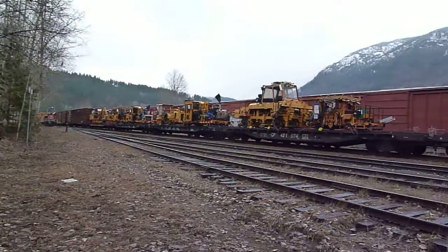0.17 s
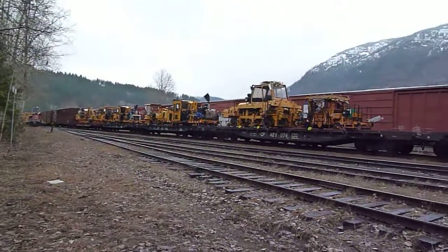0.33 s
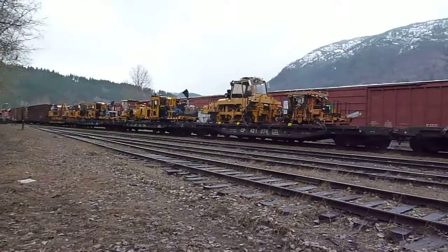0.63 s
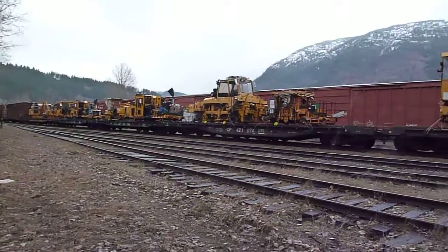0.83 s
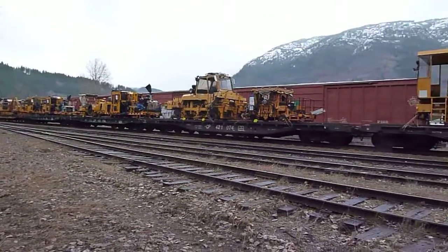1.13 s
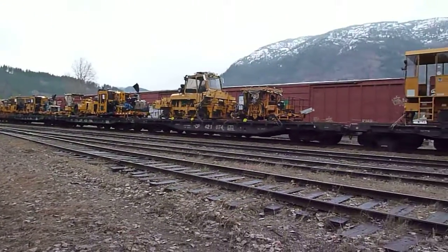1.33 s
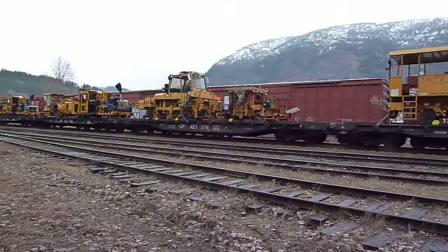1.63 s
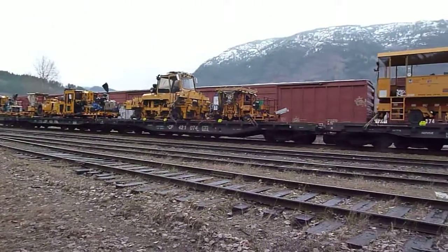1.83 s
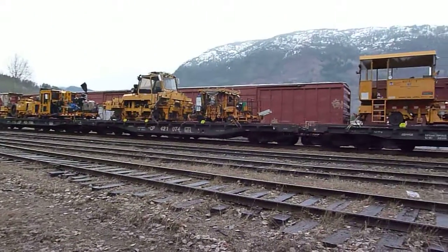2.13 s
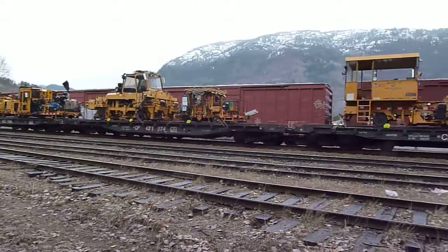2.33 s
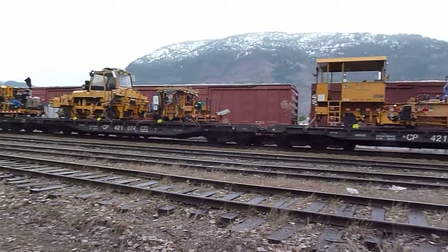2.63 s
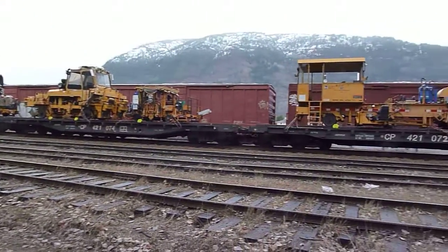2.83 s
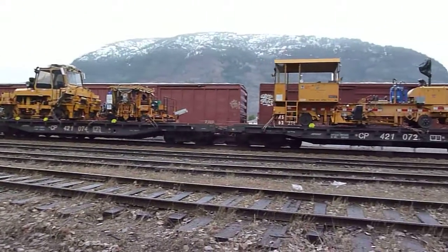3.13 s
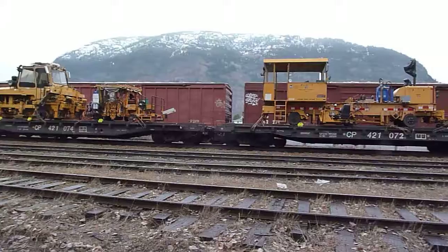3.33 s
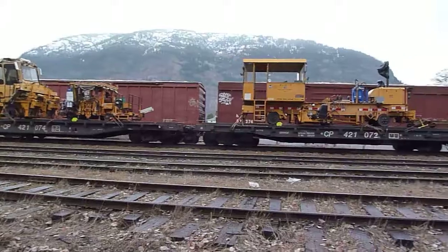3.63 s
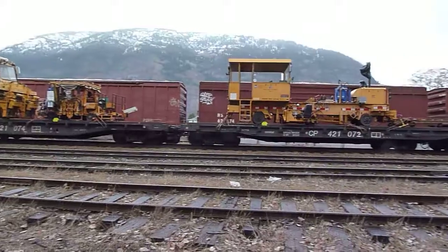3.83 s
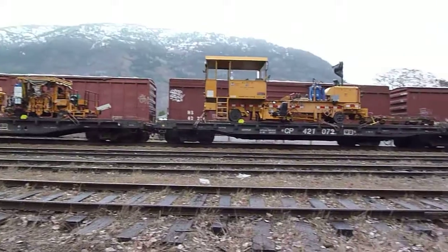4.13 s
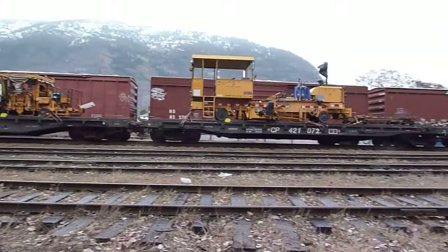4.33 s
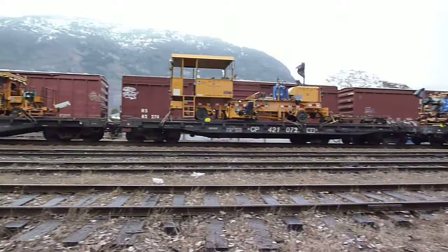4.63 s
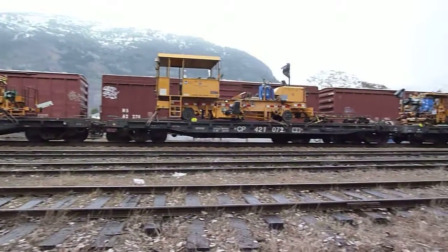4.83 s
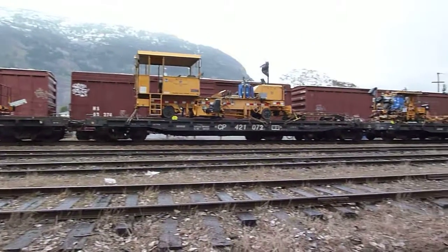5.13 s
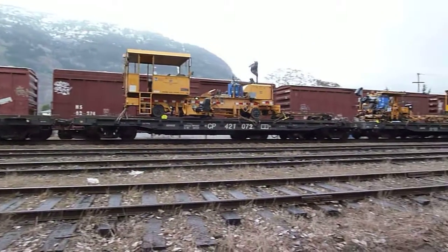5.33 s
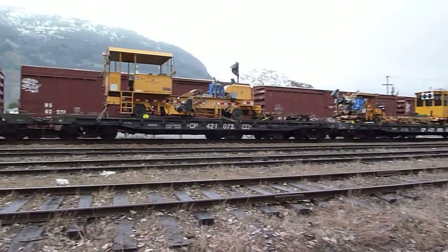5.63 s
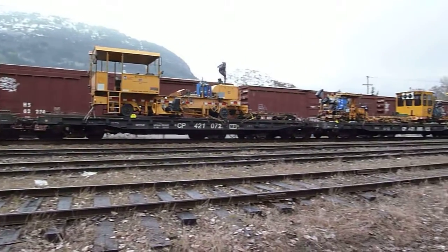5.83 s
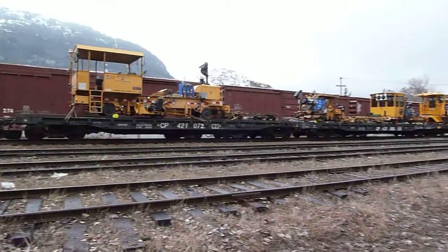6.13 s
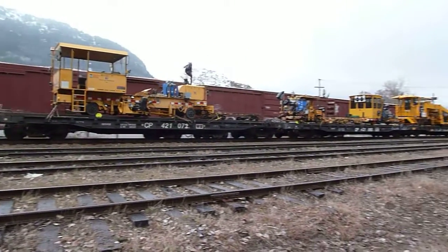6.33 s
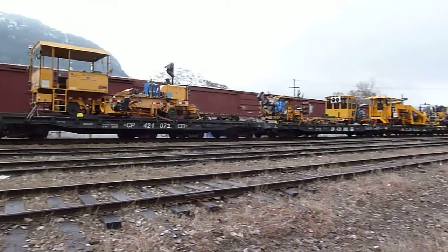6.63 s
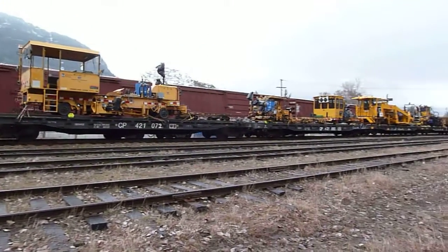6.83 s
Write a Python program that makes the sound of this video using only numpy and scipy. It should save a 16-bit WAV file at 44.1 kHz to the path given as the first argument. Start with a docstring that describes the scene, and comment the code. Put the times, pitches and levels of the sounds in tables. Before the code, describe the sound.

Loaded flat cars rumble slowly through a rail yard with steel clanks, joint clacks and wavering squeal, birds chirping, wind thumping at the end.

```python
"""A rail yard, heard from a few tracks away, as loaded flat cars roll slowly through.
Filtered noise makes the wheels' rumble, roar, hiss and ringing; moving narrow bands of noise make boom and squeal.
Bursts ringing in steel make rail-joint clacks and coupling clanks, and beating tones make a diesel throb.
Small birds on the left are gliding tones and bursts of noise; a rising breeze buffets the two microphone ports."""
import sys
import numpy as np
from scipy import signal
from scipy.fft import rfft, irfft, next_fast_len
from scipy.io import wavfile
from scipy.ndimage import uniform_filter1d, minimum_filter1d, map_coordinates

SR = 44100
rng = np.random.default_rng(int(sys.argv[2]) if len(sys.argv) > 2 else 0)


def put_to_file(sound):
    """Save the sound as 16-bit audio at rate SR, in the file named by the first command-line argument."""
    columns = np.atleast_2d(sound).T  # one column per channel
    safe = np.clip(columns, -1, 1)
    whole_steps = np.round(safe * 32767)
    wavfile.write(sys.argv[1], SR, whole_steps.astype(np.int16))


N = 307377

# steady rolling, louder as each group of wheels comes near; each layer adds its own gain:
# time_s, roar_db (rails), hiss_db (wheel contact)
ROLLING_LEVELS = [(0.0, -37.5, -47), (0.78, -38.5, -46.5), (0.99, -40, -49.5), (1.48, -38.5, -45.5),
                  (1.96, -39, -51), (3.02, -42.5, -48.5), (4.35, -39, -49.5), (4.6, -38, -46),
                  (5.61, -39, -45.5), (6.35, -42, -49.5)]
# ringing of loose steel parts, before any shift in pitch: pitch_hz, width_hz, relative_level_db
STEEL_MODES = [(460, 230, 2), (800, 480, 1.5), (1180, 730, -3.5), (1790, 490, -1.5), (2530, 510, -5),
               (3900, 2000, -23.5)]


def amp(db):
    """Turn decibels into a gain."""
    return 10 ** (np.asarray(db) / 20)


def unit(x):
    """Scale a signal to an average (rms) level of 1."""
    return x / np.sqrt(np.mean(x ** 2) + 1e-20)


def along(points, hz):
    """Read a curve of (frequency, value) points on a logarithmic frequency axis."""
    f, v = np.transpose(points)
    return np.interp(np.log(hz + 1), np.log(f + 1), v)


def curves(rows):
    """Join table points by straight lines: one value per sample for each column after the time."""
    s, *columns = np.transpose(rows)
    return [np.interp(np.arange(N) / SR, s, column) for column in columns]


def wobble(rate):
    """Make a smooth random curve with this many random points a second."""
    points = rng.standard_normal(int(N * rate / SR) + 4)
    return map_coordinates(points, [np.arange(N) * rate / SR])


def swells(rows):
    """Gain of bell-shaped swells (time, half length, dB); overlapping ones add as power."""
    t = np.arange(N) / SR
    return np.sqrt(sum(amp(db) ** 2 * np.exp(-((t - s) / length) ** 2) for s, length, db in rows))


def filtered(x, response):
    """Shape a sound by a gain that depends on frequency."""
    m = next_fast_len(N + SR // 2)
    return irfft(rfft(x, m) * response(np.fft.rfftfreq(m, 1 / SR)), m)[..., :N]


def resonances(modes, f):
    """Response of a body that rings at several (Hz, width Hz, dB) modes after it is driven."""
    total = 0
    for k, (center, width, db) in enumerate(modes):
        sign = (-1) ** k
        total = total + sign * amp(db) * 1j * f * width / (center * center - f * f + 1j * f * width)
    return total


def add(track, s, sound):
    """Mix a sound into a track, starting at s seconds."""
    part = track[..., max(0, round(s * SR)):][..., :sound.shape[-1]]
    part += sound[..., :part.shape[-1]]


def spread(pair):
    """Blend two unrelated signals into left and right: alike in the bass, wider in the treble."""
    # how alike the two sides are: pitch_hz, likeness (1 = the same)
    likeness = [(60, 1), (500, 1), (1100, 0.89), (2000, 0.58), (3200, 0.26), (5000, 0.27), (7000, 0.59)]

    def mid_side_gains(hz):
        turn = np.arccos(np.clip(along(likeness, hz), -1, 1)) / 2
        return np.array([np.cos(turn), np.sin(turn)])

    mid, side = filtered(pair, mid_side_gains)
    return unit(np.array([mid + side, mid - side]))


def rush(spectrum, patchy_db):
    """Stereo noise of rms 1, with random louder and softer patches in time and pitch."""
    z = signal.stft(rng.standard_normal((2, N)), nperseg=512)[2]
    field = uniform_filter1d(rng.standard_normal(z.shape[1:]), size=5, axis=0)  # smooth over pitch
    field = uniform_filter1d(field, size=14, axis=1)  # smooth over time
    pair = signal.istft(z * amp(patchy_db * unit(field)), nperseg=512)[1][:, :N]
    return spread(filtered(pair, lambda hz: amp(along(spectrum, hz))))


def drone(hz, width_hz):
    """A resonance of rms 1 kept going by random pushes; its pitch may move."""
    phase = 2 * np.pi * np.cumsum(hz * np.ones(N)) / SR
    return unit(wobble(width_hz) * np.cos(phase) + wobble(width_hz) * np.sin(phase))


def yard(x):
    """Diffuse echo from standing cars and trees: a fading tail of noise, different for each ear."""
    # time the echo takes to fade by 60 dB: pitch_hz, fade_s
    echo_fade = [(150, 0.31), (1500, 0.43), (7000, 0.64)]
    hz, t, z = signal.stft(rng.standard_normal((2, SR // 2)), SR, nperseg=256)
    fading = z * amp(-60 * t / along(echo_fade, hz)[:, None])
    tail = signal.istft(fading, SR, nperseg=256)[1]
    return signal.fftconvolve(x[None], tail / np.linalg.norm(tail[0]), axes=1)[:, :N]


def diesel(drone_hz=59, level_db=-31, beat_hz=5.2, beat_db=-13):
    """An exhaust drone with two weak upper tones; a tone just below it beats with it and makes it throb."""
    # loudness of the engine: time_s, relative_level_db
    fade = [(0, -7.5), (1.2, 0), (6.1, 0), (6.7, -13)]
    fade_db, = curves(fade)
    phase = 2 * np.pi * np.cumsum(drone_hz + 0.18 * wobble(4.4)) / SR
    throb = amp(beat_db) * np.sin(phase - 2 * np.pi * beat_hz * np.arange(N) / SR)
    crank = phase / 3  # the main drone is three times the crank's pitch
    upper = amp(-9.5) * np.sin(5 * crank) + amp(-14.5) * np.sin(7 * crank)
    return amp(level_db + fade_db) * np.sqrt(2) * (np.sin(phase) + throb + upper)


def whistles(arch_hz=39, quaver_hz=75, wet_db=-3):
    """Thin gliding bird notes that bow upward in the middle, quaver and echo among the trees."""
    # bird notes, pitch before bow and quaver: start_s, length_s, starting_pitch_hz, fall_hz, level_db
    notes = [(0.025, 0.03, 7090, 382, -39), (0.054, 0.042, 6740, 63, -43.5),
             (0.268, 0.057, 7230, -4.5, -49), (0.278, 0.038, 6800, -63, -43),
             (0.333, 0.044, 7360, 76, -38.5), (0.404, 0.051, 7380, 64, -37), (0.46, 0.026, 7200, 201, -39),
             (0.766, 0.14, 7370, 37, -46.5), (0.895, 0.096, 7500, 738, -46),
             (1.65, .012, 6600, -200, -50.5), (1.672, 0.012, 6550, -350, -44), (1.7, .012, 6900, 307, -49),
             (1.753, 0.014, 6540, -300, -46), (1.779, 0.047, 6740, 102, -44), (1.861, 0.19, 7140, -27, -53),
             (1.893, .025, 6550, 51, -51), (2.073, 0.082, 7020, 94, -48), (2.125, 0.02, 6500, 127, -38.5),
             (2.552, 0.085, 7100, 379, -49), (2.679, 0.039, 6730, -280, -41.5),
             (3.494, 0.072, 6900, 45, -48.5), (3.568, 0.06, 6930, 126, -50)]
    song = np.zeros(N)
    for s, length, start_hz, fall_hz, db in notes:
        u = np.linspace(0, 1, max(8, int(length * SR)))
        bow = np.abs(np.sin(np.pi * u))
        hz = start_hz - fall_hz * u + arch_hz * bow + quaver_hz * wobble(200)[:len(u)]
        add(song, s, amp(db) * np.sqrt(bow) * np.sin(2 * np.pi * np.cumsum(hz) / SR))
    return song + amp(wet_db) * yard(song)


def chips(rise_s=0.0022, gain_db=11.5, wet_db=-11):
    """Short, toneless scolding notes: bursts of noise in three broad bands, with a faint echo."""
    # bird chips, before the shared gain: start_s, level_db, decay_s
    calls = [(2.153, -37.5, 0.03), (2.288, -37, 0.016), (2.333, -39.5, 0.022), (2.393, -36, .013),
             (2.492, -35.5, 0.02), (2.538, -38, 0.021), (2.646, -37, 0.019), (2.813, -36.5, 0.017),
             (2.873, -38, 0.025), (2.931, -39, 0.022), (2.97, -38, 0.028), (3.995, -40, .025),
             (6.578, -39, 0.065), (6.661, -39, 0.044)]
    # bands of their noise: pitch_hz, width_hz, relative_level_db
    bands = [(4350, 370, -6.5), (6180, 910, -3.5), (6860, 1500, -7)]
    t = np.arange(SR // 4) / SR
    bursts = np.zeros(N)
    for s, db, decay_s in calls:
        shape = (1 - np.exp(-t / rise_s)) * np.exp(-t / decay_s)
        add(bursts, s, amp(db + gain_db) * shape * rng.standard_normal(len(t)))
    notes = filtered(bursts, lambda f: resonances(bands, f))
    return notes + amp(wet_db) * yard(notes)


def birds():
    """The small flock sits a little to the left: slightly louder there than on the right."""
    return (whistles() + chips()) * amp([[.7], [-.7]])


def breeze(calm_db=-43, freshen_db_per_s=0.8, lumpy_db=1.5, tearing_db=14, t60_s=0.04, attack_s=0.0025):
    """Air pushes each port on its own, brighter when strong; the biggest eddies land as dull thuds."""
    # gusts on the ports: time_s, half_length_s, level_db
    gusts = [(1.0, 0.018, -30), (4.05, 0.092, -31), (5.635, .018, -28), (5.77, 0.03, -31),
             (5.91, 0.044, -25.5), (6.1, 0.023, -27.5), (6.58, 0.11, -19.5), (6.83, 0.046, -21)]
    # slow, inaudible shoves of air that add to the peaks the limiter meets: time_s, half_length_s, level_db
    shoves = [(6.53, 0.065, -16), (6.88, 0.028, -15)]
    # eddies that slap a port: start_s, peak_db, pitch_hz, left_over_right_db
    eddies = [(6.514, -8, 210, -2.5), (6.524, -20, 410, 7), (6.537, -15, 129, -2),
              (6.586, -12.5, 154, -9.5), (6.646, -13.5, 270, 8.5), (6.676, -11.5, 199, 2),
              (6.831, -10.5, 278, 2), (6.845, -14.5, 240, -13.5)]
    # tone of the ordinary buffeting: pitch_hz, relative_level_db (per Hz)
    buffet = [(20, -13), (55, 0.5), (95, 5.5), (180, -1.5), (300, -11), (550, -21), (1000, -30.5),
              (2500, -53), (7000, -78)]
    # tone of what strong gusts add: pitch_hz, relative_level_db (per Hz)
    tearing = [(100, -16.5), (220, 2.5), (400, 2), (700, -11), (1200, -29.5), (2500, -40), (7000, -67)]
    calm = amp(calm_db + freshen_db_per_s * np.arange(N) / SR + 2.7 * wobble(4.4))
    flow = np.hypot(calm, swells(gusts))
    lumps = amp(lumpy_db * np.array([wobble(60), wobble(60)]))

    def churn(spectrum):
        noise = lumps * rng.standard_normal((2, N))
        return unit(filtered(noise, lambda hz: amp(along(spectrum, hz))))

    wind = flow * churn(buffet)
    wind += amp(tearing_db) * flow ** 2 * churn(tearing)  # grows with the square of the flow
    wind += swells(shoves)
    t = np.arange(SR // 5) / SR
    for s, db, hz, pan_db in eddies:
        thud = np.sin(2 * np.pi * hz * t) * amp(-60 * t / t60_s) * (1 - np.exp(-t / attack_s))
        sides = amp([[pan_db / 2], [-pan_db / 2]])
        add(wind, s, thud / np.abs(thud).max() * amp(db) * sides)
    return wind


def tick(s=6.9495, db=-20):
    """One small dry click: a very short burst of noise in one broad band."""
    t = np.arange(SR // 100) / SR
    click = np.zeros(N)
    add(click, s, amp(db - 60 * t / 0.0054) * rng.standard_normal(len(t)))
    return filtered(click, lambda f: resonances([(3500, 3000, 2.3)], f))


def rattle(level_db=-51, t60_s=0.061, count=150):
    """Chains and loose fittings on the load clink faintly at random, ringing like steel."""
    t = np.arange(SR // 10) / SR
    shake = np.zeros(N)
    for when, size in rng.random((count, 2)):
        add(shake, when * N / SR, amp(-10 * size - 60 * t / t60_s))
    clinks = filtered(shake * rng.standard_normal((2, N)), lambda f: resonances(STEEL_MODES, f))
    return amp(level_db) * spread(clinks)


def clanks(rise_s=0.0014, clash_t60_s=0.034, strike_db=11, tail_db=-17, tail_t60_s=0.68,
           knock_t60_s=0.078, knock_gain_db=3, side_db=-9, wet_db=-12):
    """Slack steel parts strike and clash, each at its own pitch, chatter on and knock the frame."""
    # slack couplings and chains: start_s, level_db, low_knock_db (before its gain), pitch_ratio
    hits = [(.561, -22.5, -1, 1.4), (.835, -21.5, 0, 0.83), (1.228, -25, -9, 1.43), (1.28, -23, 6.5, 0.91),
            (1.447, -18, -12, 0.83), (3.113, -22.5, 0, 1.2), (3.726, -18.5, -3, 0.69),
            (4.131, -19.5, -4.5, 1), (4.155, -21, -11, 1.1), (5.081, -20.5, -8.5, 1.4),
            (5.197, -13.5, -18, 1.02), (5.215, -16.5, -6, .9), (6.046, -25, -4, 1.9),
            (6.382, -17, -12, 1.3)]
    t = np.arange(SR // 3) / SR
    f = np.fft.rfftfreq(SR, 1 / SR)
    track = np.zeros((2, N))
    middle_only = np.array([[1], [0]])
    chatter = amp(-60 * t / clash_t60_s) + amp(tail_db - 60 * t / tail_t60_s)
    fade = (1 - np.exp(-t / rise_s)) * chatter
    for s, db, knock_db, pitch in hits:
        a, b = rng.standard_normal((2, 2, len(t)))
        # the strike is a single sharp push, the clash a burst of noise
        clash = (rfft(a * fade, SR) + amp(strike_db) * middle_only) * resonances(STEEL_MODES, f / pitch)
        thump = b * amp(knock_db + knock_gain_db - 60 * t / knock_t60_s)
        knock = rfft(thump, SR) * resonances([(376, 380, 0.011)], f / pitch)
        add(track, s, amp(db) * irfft(clash + knock * middle_only, SR)[:, :len(t)])
    mid, side = track[0], amp(side_db) * track[1]
    return np.array([mid + side, mid - side]) + amp(wet_db) * yard(mid)


def clacks(rise_s=0.00062, t60_s=0.04, thump_hz=410, thump_width_hz=300, thump_t60_s=0.035,
           dull_hz=4300, wet_db=-7):
    """A wheel drops over a rail joint: a crack in the rail ends, a thump in the bogie, dulled by distance."""
    # wheels at the joint: start_s, crack_db, thump_over_crack_db
    drops = [(1.436, -27, 1), (3.039, -39, 9.5), (3.102, -33.5, 6), (3.74, -37.5, -2), (5.068, -40.5, 13),
             (5.191, -29.5, -9)]
    # ringing of the rail ends: pitch_hz, width_hz, relative_level_db
    rail_ends = [(880, 220, 6.5), (1730, 310, 5.5), (2150, 600, -1), (2500, 170, 4), (3150, 640, -14.5),
                 (4400, 470, -19)]
    t = np.arange(SR // 8) / SR
    f = np.fft.rfftfreq(SR, 1 / SR)

    def burst(modes, decay_s):
        contact = rng.standard_normal(len(t)) * (1 - np.exp(-t / rise_s)) * amp(-60 * t / decay_s)
        ring = irfft(rfft(contact, SR) * resonances(modes, f), SR)[:len(t)]
        return ring / np.std(ring[:SR // 100])  # level set over the first hundredth of a second

    hits = np.zeros(N)
    for s, db, thump_db in drops:
        crack = burst(rail_ends, t60_s)
        thump = burst([(thump_hz, thump_width_hz, 0)], thump_t60_s)
        add(hits, s, amp(db) * (crack + amp(thump_db) * thump))
    hits = signal.lfilter(*signal.butter(2, dull_hz, fs=SR), hits)
    return hits + amp(wet_db) * yard(hits)


def flanges(waver=.013, waver_rate=40, width_hz=115, chatter_db=1.0):
    """Flanges grind along the rail in one rough, wavering squeal; where they bind, other modes join in."""
    # the long squeal, before wavering: time_s, pitch_hz, level_db
    squeal_path = [(3.7, 1360, -66), (3.92, 1365, -52.5), (4.22, 1360, -51), (4.36, 1370, -44.5),
                   (4.64, 1425, -44.5), (5.24, 1400, -59), (5.33, 1385, -38.5), (5.53, 1410, -43.5),
                   (5.9, 1425, -45.5), (6.4, 1370, -64)]
    # flanges binding on the rail, before wavering: time_s, half_length_s, pitch_hz, width_hz, level_db
    bind_list = [(4.123, 0.068, 1900, 92.4, -56), (5.1, .13, 2930, 350, -49.5),
                 (5.347, 0.065, 2290, 130, -45), (5.44, 0.075, 3190, 750, -46),
                 (6.865, 0.055, 940, 91.4, -40.5)]
    t = np.arange(N) / SR
    bend = 1 + waver * wobble(waver_rate)
    pitch_hz, level_db = curves(squeal_path)
    squeal = amp(level_db) * drone(pitch_hz * bend, width_hz)
    binds = np.zeros(N)
    for s, length, hz, width, db in bind_list:
        swell = np.exp(-.5 * ((t - s) / length) ** 2)
        binds += amp(db) * swell * drone(hz * bend, width)
    return (squeal + binds) * unit(amp(chatter_db * wobble(70)))


def wheels(gain_db=-9):
    """Rubbing on the rail keeps the wheel discs ringing, most of all as they come abreast."""
    # ringing of the wheel discs: pitch_hz, width_hz, relative_level_db
    discs = [(1337, 46, 0.5), (1385, 31, 6.5), (1465, 35, -2.5), (2665, 33, -3.5), (3010, 25, -3.5)]
    _, hiss_db = curves(ROLLING_LEVELS)
    ring = spread(filtered(rng.standard_normal((2, N)), lambda f: resonances(discs, f)))
    return amp(hiss_db + gain_db + 1.0 * wobble(11)) * ring


def boom(width_hz=24):
    """The main resonance of the decks wanders in pitch and surges under heavy wheels."""
    # hollow boom, drifting as the cars go by: time_s, pitch_hz, level_db
    path = [(0, 190, -41), (1.0, 205, -38), (1.9, 178, -34), (2.3, 205, -30.5), (2.7, 215, -31),
            (3.3, 222, -33.5), (3.7, 215, -33), (4.0, 195, -37), (4.4, 210, -30.5), (4.9, 197, -25),
            (5.3, 208, -32), (5.58, 190, -38.5), (5.82, 190, -22.5), (6.05, 200, -42), (6.3, 215, -27.5),
            (6.97, 205, -35.5)]
    hz, db = curves(path)
    return amp(db) * drone(hz, width_hz)


def bogies(thud):
    """Each thud sets the bogie frames droning hollowly: noise through their modes, swelling with it."""
    # frame modes, before squaring sharpens them: pitch_hz, width_hz, relative_level_db
    frame = [(276, 42.5, 2.5), (365.4, 28, 4.5), (471.4, 34, 1.5), (585, 27, 0.5)]
    hollow = filtered(rng.standard_normal((2, N)), lambda f: resonances(frame, f) ** 2)
    return thud * amp(wobble(6.3)) * spread(hollow)


def rolling(roar_gain_db=3, hiss_gain_db=5.5, scuff_hiss_db=-10.5, scuff_deck_db=-0.5):
    """Rough treads shake decks and rails and swell at each scuff; the same bumps roughen roar and hiss."""
    # deck rumble, easing once the loaded car is past: time_s, level_db
    rumble_levels = [(0, -25.5), (2.75, -25.5), (2.93, -31), (3.1, -27), (4.3, -26), (5.4, -26.5),
                     (5.58, -30.5), (5.8, -27.5), (6.97, -27)]
    # a rough patch of tread meets the rail, about once a wheel turn:
    # time_s, half_length_s, scrape_db, thud_db
    scuffs = [(0.563, 0.046, -33.5, -43), (0.856, 0.088, -33.5, -37.5), (1.304, 0.053, -36.5, -38),
              (1.473, 0.087, -34.5, -43), (1.831, 0.043, -34, -31.5), (2.62, 0.11, -34, -40.5),
              (3.122, 0.093, -35.5, -42), (3.406, 0.093, -37.5, -50), (3.779, 0.062, -35, -32.5),
              (4.655, 0.091, -33, -38), (4.948, 0.19, -51, -30), (5.32, 0.14, -34.5, -32.5),
              (5.85, 0.053, -33.5, -30), (6.376, 0.066, -35.5, -31), (6.715, 0.051, -37, -41)]
    # tone of deck rumble, rail roar and contact hiss, each: pitch_hz, relative_level_db (per Hz)
    decks = [(20, -34), (40, -16), (72, -9), (97, -0.5), (120, -1), (155, 2.5), (185, -0.5), (207, 0.5),
             (243, -2), (320, -9), (400, -13.5), (600, -33), (1200, -75.5)]
    rails = [(180, -36.5), (300, -1), (380, 1), (430, -3.5), (490, 1), (700, -2.5), (830, -7), (1300, -9),
             (1600, -16.5), (2600, -21.5), (6000, -62.5)]
    contact = [(600, -27), (1200, 4.5), (1800, 4.5), (2600, 2), (3600, 1), (5000, -4), (5600, -6.5),
               (7000, -11), (7900, -28)]
    roar_db, hiss_db = curves(ROLLING_LEVELS)
    rumble_db, = curves(rumble_levels)
    scrape = swells([(s, length, db) for s, length, db, _ in scuffs])
    thud = swells([(s, length, db) for s, length, _, db in scuffs])
    bumps = wobble(45)
    # steady and scuffing parts add as power
    rumble_gain = np.hypot(amp(rumble_db), amp(scuff_deck_db) * thud)
    roar_gain = np.hypot(amp(roar_db + roar_gain_db), scrape)
    hiss_gain = np.hypot(amp(hiss_db + hiss_gain_db), amp(scuff_hiss_db) * scrape)
    rumble = rumble_gain * amp(0.86 * wobble(12)) * rush(decks, patchy_db=0)
    roar = roar_gain * amp(0.74 * bumps) * rush(rails, patchy_db=1.5)
    hiss = hiss_gain * amp(1.0 * bumps) * rush(contact, patchy_db=1.5)
    return rumble + roar + hiss + bogies(thud)


def scene():
    """The train, slightly to the right, with birds and breeze around it."""
    train = diesel() + rattle() + clanks() + clacks() + flanges() + wheels() + boom() + rolling()
    return birds() + breeze() + tick() + train * amp([[-.3], [.3]])


def limiter(x, ceiling_db=-9, hold_s=0.025, recover_s=0.067):
    """A peak over the ceiling turns both channels down; the gain holds, then recovers."""
    over_db = np.maximum(20 * np.log10(np.abs(x).max(axis=0) + 1e-9) - ceiling_db, 0)
    hold = int(hold_s * SR)
    held_db = -minimum_filter1d(-over_db, hold, origin=(hold - 1) // 2)
    # after each peak the reduction, in decibels, dies away exponentially
    age = np.arange(N) / SR / recover_s
    duck_db = np.exp(np.maximum.accumulate(np.log(held_db + 1e-9) + age) - age)
    return x * amp(-uniform_filter1d(duck_db, size=64))


def pinprick(s=3.353, db=-27):
    """One faint, very bright click, a single sample long: thinner than anything in the yard."""
    click = np.zeros(N)
    add(click, s, amp([db]))
    return click


def record(dry, low_cut_hz=24, top_hz=7620, sampling_hz=16000, mirror_db=-20, click_top_hz=15900):
    """Limit peaks, cut deep bass and high treble; low-rate sampling faintly mirrors the band's top."""
    def band(hz):
        low_cut = 1 - 1 / (1 + (hz / low_cut_hz) ** 8)
        return low_cut / np.sqrt(1 + (hz / top_hz) ** 120)

    kept = filtered(limiter(dry), band)
    mirror = 2 * kept * np.cos(2 * np.pi * sampling_hz * np.arange(N) / SR)
    mirrored = kept + amp(mirror_db) * mirror
    narrow = filtered(mirrored, lambda hz: 1 / np.sqrt(1 + (hz / 8700) ** 200))
    # the pinprick joins after the narrow band, so it keeps more treble
    return filtered(narrow + pinprick(), lambda hz: hz < click_top_hz)


dry = scene()
out = record(dry)
put_to_file(out)
```